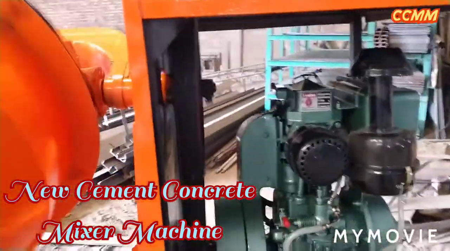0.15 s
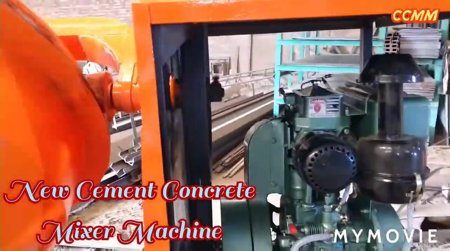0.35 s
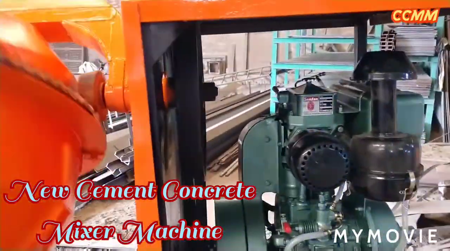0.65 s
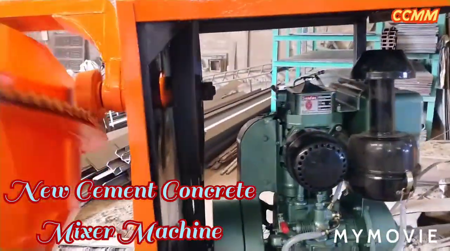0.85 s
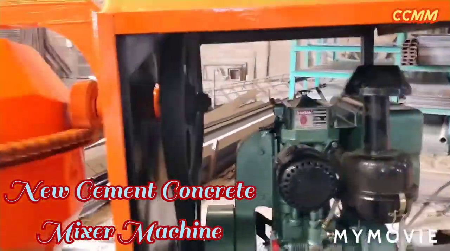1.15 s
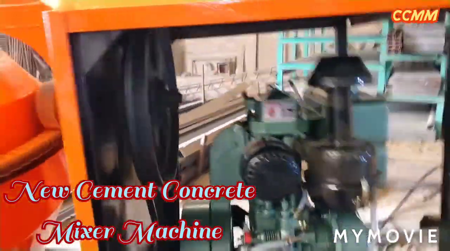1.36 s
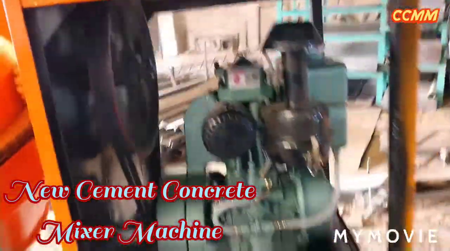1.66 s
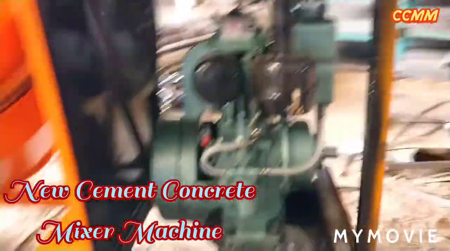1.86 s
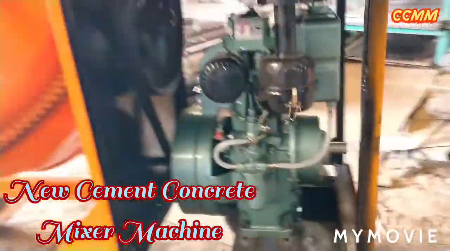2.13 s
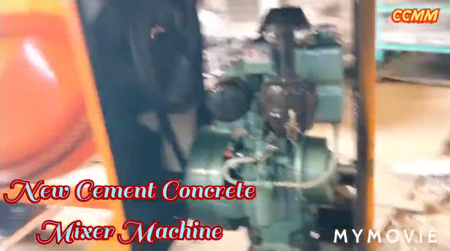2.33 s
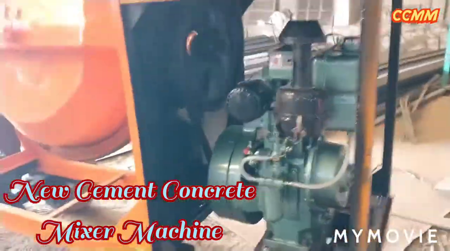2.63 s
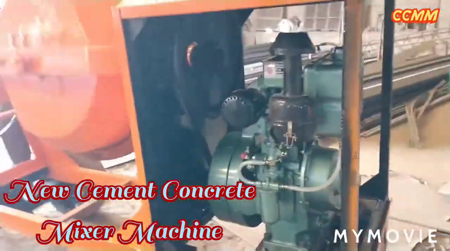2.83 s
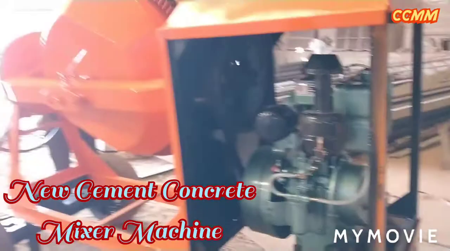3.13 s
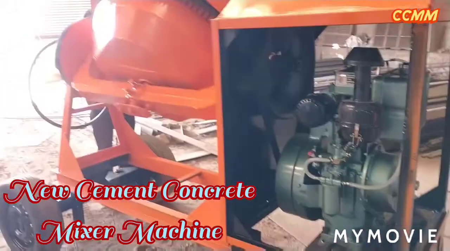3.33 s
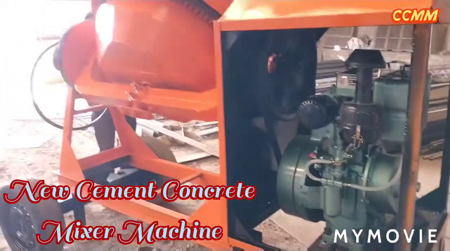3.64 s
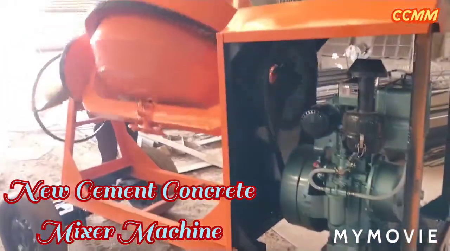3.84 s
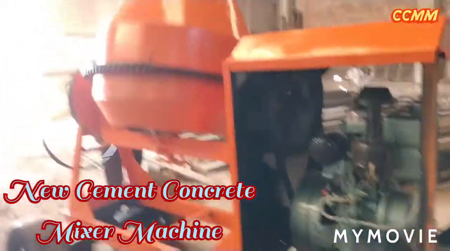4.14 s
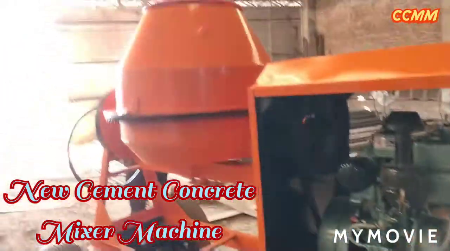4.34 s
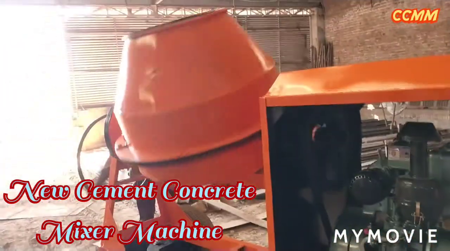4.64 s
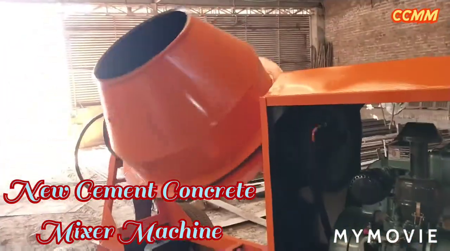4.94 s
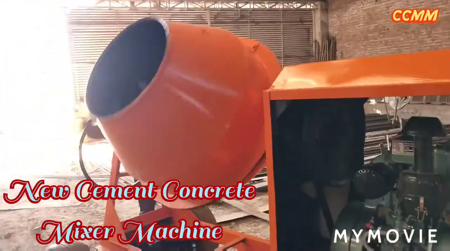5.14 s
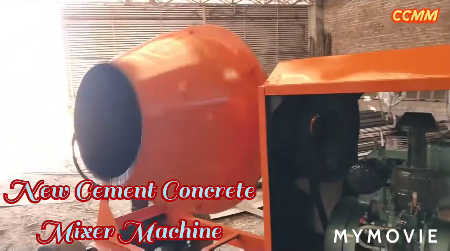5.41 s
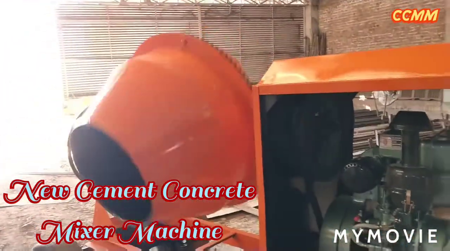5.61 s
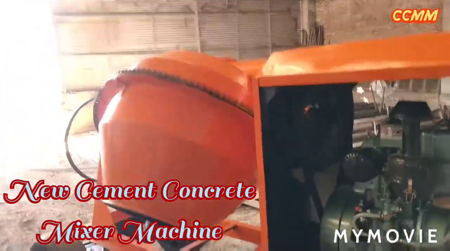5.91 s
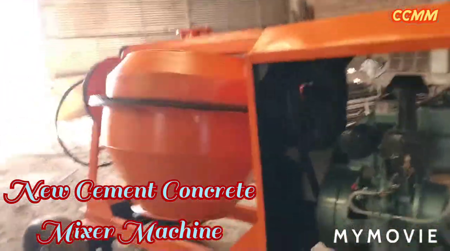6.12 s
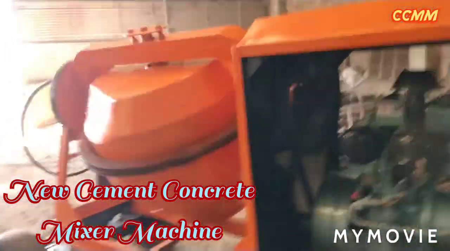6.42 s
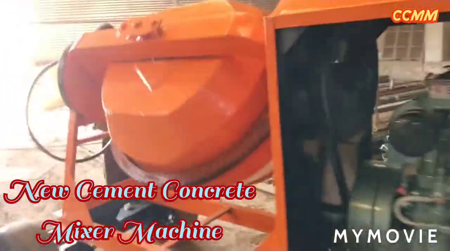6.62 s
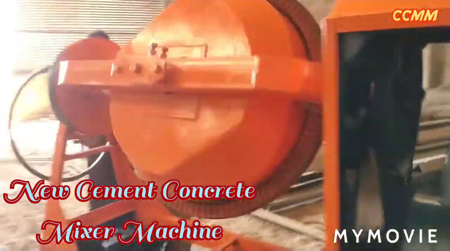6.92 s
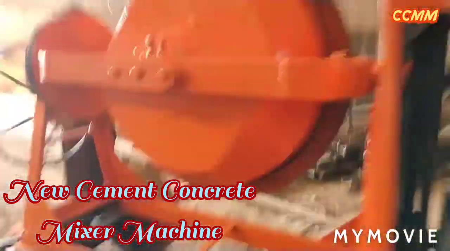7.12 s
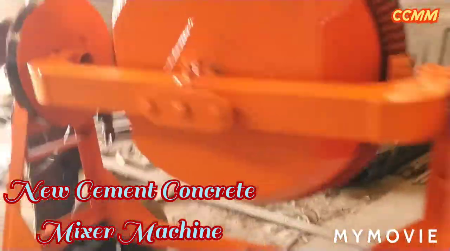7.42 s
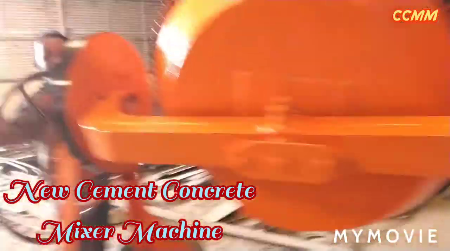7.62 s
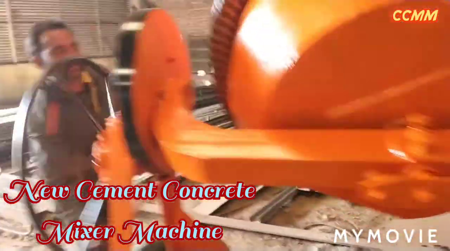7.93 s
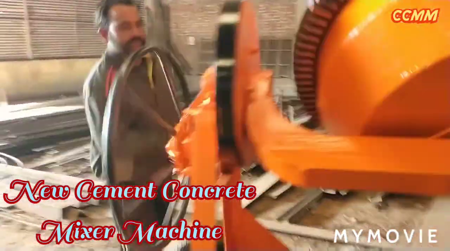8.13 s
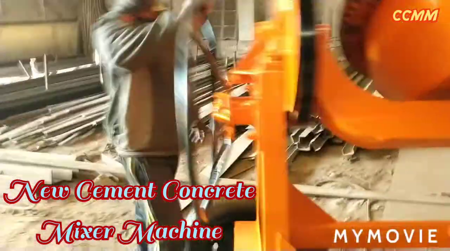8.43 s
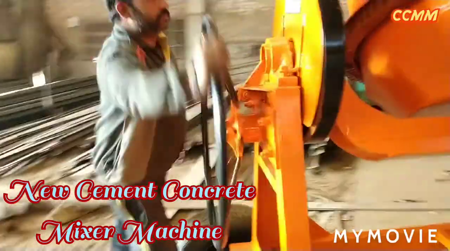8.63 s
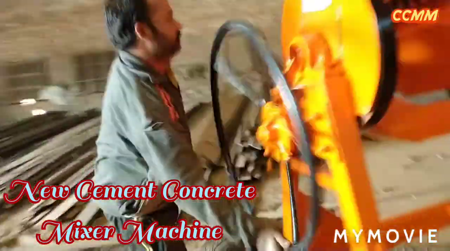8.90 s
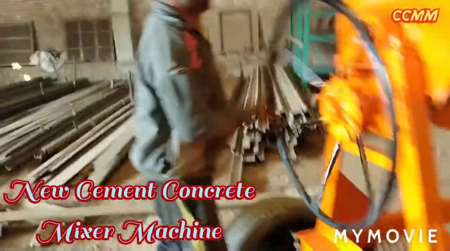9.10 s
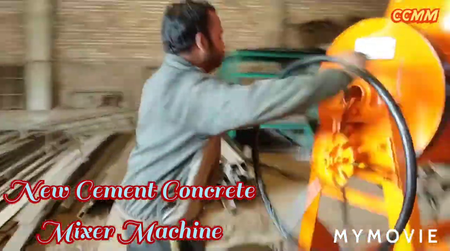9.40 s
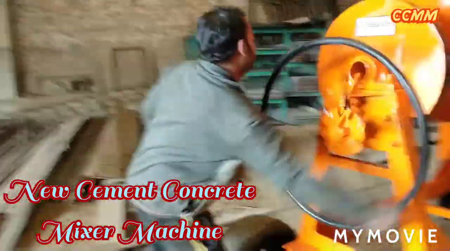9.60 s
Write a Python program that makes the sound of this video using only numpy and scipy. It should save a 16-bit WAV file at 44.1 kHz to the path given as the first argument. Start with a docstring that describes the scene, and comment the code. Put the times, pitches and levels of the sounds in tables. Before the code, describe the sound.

Steady rapid chugging from a small diesel: each beat a spitting exhaust puff, pipe thump, casing clank and small gear knocks and valve ticks. Drum rumble and rushing air fill the gaps. The single moving microphone starts beside it, drifts off from two seconds, passes near again at seven with a lower whistle, and ends with the engine faint.

```python
"""A one-cylinder diesel drives a steel mixer drum in an open yard while a mono microphone walks round it.
Close by at first, coloured noise rumbles and rushes; every tenth of a second a firing sends shaped noise
through resonances: whistling cap, thumping pipe, clanking casing, then gear knocks, valve ticks and chuffs.
The engine recedes from about 2 s, grows nearer again with a lower whistle near 7 s as the microphone
passes behind the drum, and is faint by the end."""
import sys
import numpy as np
from scipy import signal
from scipy.fft import rfft, irfft, next_fast_len
from scipy.io import wavfile
from scipy.ndimage import uniform_filter1d

SR = 44100
rng = np.random.default_rng(int(sys.argv[2]) if len(sys.argv) > 2 else 0)


def master_out(mix):
    """Clip the mix to full scale and print it as 16-bit PCM to the path in sys.argv[1]."""
    frames = np.transpose(np.atleast_2d(mix))
    ceiling = np.clip(frames, -1, 1)
    pcm = np.round(ceiling * 32767).astype(np.int16)
    wavfile.write(sys.argv[1], SR, pcm)


N = 430416  # samples
SPAN = 5120  # samples of one blow
T = np.arange(SPAN) / SR  # seconds
HZ = np.fft.rfftfreq(SPAN, 1 / SR)

# Cylinder firings, levels before each layer's trim: start_s, jet_db, whistle_hz, second_puff_db,
# muffler_shell_db, cylinder_head_db, combustion_shock_db, clank_hz, pipe_thump_db
FIRINGS = [(0.0, -18, 8500, -61, -31.5, -25.5, -30.5, 2070.0, -35),
           (0.1022, -15.5, 8270, -33, -26, -29.5, -33.5, 1660, -29.5),
           (0.2068, -23, 8700, -42, -26.5, -34.5, -35, 1610, -34.5),
           (0.3125, -28, 8600, -54.0, -39.5, -44.5, -39, 1770, -39),
           (0.4158, -30.0, 8240.0, -44, -41.5, -37.5, -42, 1850, -34),
           (0.5226, -21.5, 8820.0, -42.5, -31, -32.5, -29.5, 2140.0, -37),
           (0.6263, -22, 8700, -62, -29.5, -35.5, -41, 1800.0, -35.5),
           (0.733, -18.5, 8340, -44, -39, -36, -34, 1580, -40.5),
           (0.8377, -19, 8150, -41, -37, -36.5, -42, 1820.0, -33),
           (0.9404, -20.5, 8200, -57, -24.5, -33, -28.0, 2000, -37),
           (1.0463, -15.5, 8600, -54, -28.5, -44, -45, 1810.0, -39),
           (1.15, -18.0, 8200, -40, -28.5, -26, -32, 1690, -35),
           (1.2554, -17.5, 8660, -60, -30, -27, -29, 1750, -30),
           (1.3603, -16, 8500, -27.5, -28, -26, -31.5, 1560, -32),
           (1.4656, -18.5, 8540, -47, -33, -26.5, -36, 2100, -34.5),
           (1.5713, -14, 8240, -32, -26, -33.5, -34.5, 2000, -31.5),
           (1.675, -17, 8430, -28, -27.5, -33, -33, 1340.0, -33),
           (1.7797, -17.5, 8200, -35, -22, -36.5, -37, 1730, -35),
           (1.8861, -14, 8330, -28.0, -32.0, -30, -29, 1390, -43),
           (1.9897, -18.5, 8360, -36.5, -22.5, -34, -32.5, 1540.0, -28),
           (2.095, -17.5, 8500, -36.5, -27, -32.5, -25.5, 1570, -40.5),
           (2.1996, -25, 8550, -53.5, -19, -40, -40, 1520.0, -37),
           (2.3046, -25.5, 8800, -52, -34.5, -53, -45, 1930.0, -41.5),
           (2.4105, -24.5, 7700, -43, -35, -55.5, -45, 1810.0, -43),
           (2.517, -19.5, 7800, -43, -52, -57, -38, 1570.0, -38.5),
           (2.6207, -34, 8340, -53, -50, -57, -45.5, 1610.0, -47.0),
           (2.7288, -21.5, 7900, -38, -62, -53, -44, 2120, -43.5),
           (2.8337, -24.5, 8000.0, -48.0, -52, -56.0, -38, 1800, -39),
           (2.9355, -18, 8180, -51, -40, -49, -41, 2060, -43),
           (3.0407, -32, 8500, -46, -51, -57.5, -48, 1820.0, -46),
           (3.1447, -26, 8320.0, -52.0, -42, -67, -43, 1900, -44.0),
           (3.2498, -21, 8100, -48.5, -35, -56, -43.5, 1340.0, -44.5),
           (3.3545, -37.0, 8300, -51.5, -47, -60.5, -50, 1980.0, -47),
           (3.4584, -22.5, 8360, -52.5, -40, -42, -43.5, 1810.0, -42.0),
           (3.564, -27.5, 8500, -59, -42.5, -56, -47, 1340.0, -46.5),
           (3.6699, -24.5, 7970, -39.5, -43, -59, -46, 1840.0, -44),
           (3.7748, -24.5, 8560, -64, -36.5, -60, -47.5, 1820.0, -47.0),
           (3.879, -24, 8690.0, -43, -29.5, -46, -28, 1870, -47),
           (3.9845, -33.5, 8350, -50.0, -43, -56, -41, 1480, -49.5),
           (4.0891, -37.5, 8550, -54.5, -51, -57.5, -44.5, 1800, -49),
           (4.1932, -24.5, 6900, -41, -38, -50, -45.5, 1750.0, -49),
           (4.2988, -40, 7750, -54.0, -50, -45.5, -43, 1830.0, -52),
           (4.4044, -44.5, 8500, -63, -50, -64, -57, 2000.0, -53.0),
           (4.5091, -42, 8900, -62.5, -54, -57, -60, 1800.0, -53.0),
           (4.6157, -27, 8000, -49.5, -42, -42, -34.5, 1860, -44),
           (4.7203, -22, 8140, -52.5, -36, -52, -28.0, 2030, -47),
           (4.8259, -34.5, 8560, -49.5, -51.5, -48, -47, 1830.0, -48),
           (4.9312, -23, 8530, -44, -35, -53.0, -40.0, 1340.0, -46.5),
           (5.0362, -23.5, 8800, -53, -37.5, -45.5, -39.5, 1820.0, -46.5),
           (5.143, -26, 8540, -42.0, -37.5, -55, -47, 1820.0, -45.5),
           (5.248, -38, 8500, -52, -51, -49.5, -49, 1800.0, -50),
           (5.354, -31, 8800, -49, -43.5, -54.5, -45.5, 1530.0, -48.5),
           (5.4587, -38, 8600, -55, -45, -43.5, -39.5, 1340.0, -46),
           (5.5639, -33.5, 8500, -56, -44.5, -56.5, -49, 1820.0, -50.0),
           (5.6707, -37, 8500, -48.0, -45, -63, -59, 1820.0, -50),
           (5.7744, -19, 8840, -54, -41, -42.5, -36, 1750, -40.5),
           (5.8791, -43, 7800, -53.0, -50, -58, -55, 1730.0, -49),
           (5.9859, -22, 8570, -46.0, -34, -48, -47.0, 2280.0, -45),
           (6.0917, -39, 8890.0, -53, -47, -61.5, -47, 1440.0, -49),
           (6.1962, -32.5, 8430, -39, -41, -40, -30.5, 2020, -46),
           (6.303, -27.0, 8650, -45, -37.5, -50, -45.5, 1850.0, -43.5),
           (6.4077, -36.0, 7850, -51, -56, -54, -43.5, 1580.0, -40.5),
           (6.5117, -22.5, 8300, -43, -26, -34, -31, 1450, -46),
           (6.6163, -35.0, 7990.0, -37, -42, -37.5, -44, 1850.0, -41.5),
           (6.7221, -20.0, 7830, -54, -28.0, -44, -34, 1860, -35),
           (6.8262, -19.0, 7360, -31, -23.5, -30.5, -32.5, 1530, -42),
           (6.9323, -16, 7240, -36, -38.5, -42.0, -34.0, 1490, -43.5),
           (7.0374, -15, 7040, -25.5, -30, -38, -34, 1840, -32),
           (7.1436, -10.5, 7740, -29, -26, -31, -41, 1770.0, -38.5),
           (7.249, -11, 7150, -30.5, -34, -32, -35.5, 2080, -39),
           (7.3534, -14.5, 7250, -27, -33, -35, -44, 1650.0, -37),
           (7.4615, -14, 7670, -31, -40, -30.5, -29, 1540, -31.5),
           (7.5655, -14.5, 7780, -43.5, -33, -35, -42, 1620, -41),
           (7.6713, -19, 7200, -40, -39.5, -55, -45, 1490.0, -44),
           (7.7764, -15, 7130, -40, -43, -52, -40, 1840, -43),
           (7.883, -22.5, 7640, -44.0, -54, -64.0, -45.5, 1670, -42),
           (7.9864, -20, 6800, -56, -41.5, -58, -45, 1420.0, -47),
           (8.0948, -32.0, 7800, -53.0, -37, -61.0, -46, 1830.0, -50),
           (8.1994, -27, 8300, -43, -30.5, -52, -49.0, 2220.0, -47),
           (8.3059, -26.5, 7300.0, -64, -43.5, -59.0, -49, 1600.0, -52),
           (8.4122, -26, 7670.0, -52, -37.5, -59, -63, 1600.0, -47.5),
           (8.5169, -24, 7740, -56, -34, -57, -42.5, 1900, -44),
           (8.623, -44, 8460.0, -62, -47.5, -75, -53, 1840.0, -62),
           (8.729, -46.5, 8070.0, -51.5, -55, -70.0, -73, 1630, -59),
           (8.8348, -27, 7750, -37.5, -34.5, -69, -49, 1340.0, -51),
           (8.9405, -29.5, 8040, -45, -48, -74, -47.5, 2080, -49),
           (9.0461, -47.0, 7560, -56.0, -58, -79, -55, 1970, -57),
           (9.1513, -46.5, 7000, -56, -61, -66.5, -58, 2030.0, -53),
           (9.2567, -50, 7300, -61.0, -57, -76.5, -64.0, 1410.0, -62),
           (9.3597, -56, 7660.0, -61, -80.5, -77.0, -64, 1560.0, -59),
           (9.4718, -35, 7600, -56.5, -75, -74.5, -63, 1580, -49.5),
           (9.5762, -39, 7660, -45, -66, -64, -51, 1660.0, -48),
           (9.6798, -45.0, 6900, -48, -57, -70.5, -58.5, 1670.0, -48)]

# Walk round the machine: time_s, nearness_db, air_rush_db, chuff_db
WALK = [(0, 0, -45.5, -35), (.6, -1, -45.5, -36.5), (1.2, 0, -51.5, -35), (1.7, 1, -51, -35),
        (2.1, -1, -41, -37), (2.5, -7, -46, -42), (2.9, -4, -41.5, -39.5), (3.3, -10, -49.5, -47),
        (4.2, -9, -50.5, -45.5), (4.6, -10, -54.5, -46), (5.3, -8, -52.5, -46), (6.2, -8, -52, -49),
        (6.7, -5, -48, -41), (7.1, -3.5, -45.5, -44), (7.5, -6.5, -43.5, -45), (7.9, -13, -48.5, -52),
        (8.5, -14, -54, -50), (8.9, -16, -54.5, -46.5), (9.35, -26, -58, -52.5), (9.76, -16, -54.5, -47)]

# Modes of the perforated muffler cap: pitch_hz, width_hz, level_db
CAP_MODES = [(6420, 1100, -4), (6540, 89, 9.5), (7090, 160, -3.5), (7516, 81, 6), (8010, 460, 0),
             (8814, 230, 2.5), (9080, 620, -7)]
# Modes of the muffler shell: pitch_hz, width_hz, level_db
SHELL_MODES = [(4600, 450, -8.5), (5054, 190, 0), (5534, 245, -1), (5980, 93, -2)]
# Modes of the muffler box: pitch_hz, width_hz, level_db
BOX_MODES = [(247, 110, -1.5), (344.6, 55, 1.5), (406, 140, -9.5)]
# Modes of the muffler, heard in the chuffs: pitch_hz, width_hz, level_db
MUFFLER_MODES = [(512, 16, -8.5), (653, 30, -1.5), (808, 40, -1), (925, 110, -3)]
# Modes of the exhaust pipe: pitch_hz, width_hz, level_db
PIPE_MODES = [(84, 160, -7), (140, 105, 1), (304, 54, -14)]
# Modes of the cylinder head: pitch_hz, width_hz, level_db
HEAD_MODES = [(3200, 1200, 2), (3446, 400, 6), (4056, 240, -2.5)]
# Modes of the frame panels: pitch_hz, width_hz, level_db
FRAME_MODES = [(1328, 174, 0.5), (1560, 117, 0), (1812, 85, 3.5), (2110, 230, -2), (2240, 210, -3.5),
               (2500, 180, -5)]
# Modes of the gear cover: pitch_hz, width_hz, level_db
COVER_MODES = [(438, 23, -3), (641, 58, 5.5), (749, 18, 1.5), (952, 79, -7.5), (1035, 21, 3),
               (1154, 106, 1.5)]
# Modes of the steel drum: pitch_hz, half_width_hz, level_db
DRUM_MODES = [(237, 5, -2), (301, 6, 0), (458, 5, -2), (738, 4, 1), (960, 8, -2), (1017, 7, 0),
              (1147, 6, -1), (1611, 6, -2)]

# Relative spectrum of hissing gas: pitch_hz, density_db (per Hz)
GAS_SPECTRUM = [(3000, -26), (5500, -12.5), (8000, 7), (10200, 5.5), (12000, -8.5), (15300, -9),
                (16200, -52)]
# Relative spectrum of the ring gear's rumble, before the drum modes: pitch_hz, density_db (per Hz)
RUMBLE_SPECTRUM = [(40, -33), (75, -10), (140, 5), (230, -11.5), (310, -3), (540, -8.5), (950, -4.5),
                   (1300, -8.5), (1900, -4.5), (2600, -14), (3100, -26.5), (4300, -21.5), (6000, -31)]
# Relative spectrum of rushing air before the walk behind the drum: pitch_hz, density_db (per Hz)
RUSH_SPECTRUM = [(2500, -4), (3900, -16.5), (5200, -11.5), (6300, -6), (7000, -6.5), (8000, -4.5),
                 (9500, -14.5), (11300, -31), (15300, -28), (16300, -50)]
# Relative spectrum of rushing air from behind the drum onward: pitch_hz, density_db (per Hz)
RUSH_BEHIND_SPECTRUM = [(1470, -14), (2500, 2), (3050, -13.5), (3850, -7), (5310, -30), (5560, -18.5),
                        (7560, 3), (8690, -10), (9310, -20), (9900, -15), (15700, -30)]

# Pressure waves down the pipe: after_firing_ms, level_db
PUSHES = [(1.5, 9), (9.5, 9.5), (18, 4), (30, 7.5), (38, -32), (58, -20), (88, -13)]
# Gear teeth taking up slack: after_firing_ms, level_db
KNOCKS = [(19, -7), (30, -24.5), (81, -29), (88, -4), (94, -11.5)]
# Valves seating and lifting: after_firing_ms, level_db
VALVES = [(30, -6.5), (58, -9), (81, -7.5), (93, -28)]
# Gas surging into the muffler: after_firing_ms, level_db
CHUFFS = [(30, -11.5), (81, -9), (89, -4), (96, -2.5), (102, -9.5)]

# Levels that follow the nearness: (dB at nearness 0, dB gained per dB of nearness)
RUMBLE_LEVEL, TICK_LEVEL, KNOCK_LEVEL, BOX_LEVEL = (-41, 0.31), (-37, 0.98), (-41, 0.61), (-38, 1)
NEAR_DB = 4.5  # range of nearness that counts as close by
BEHIND_S = (7.05, 8.1)  # the microphone passes behind the drum

HISS_DB, HISS_SHARE = -1.5, 0.47  # offset from a level between jet and shell; the shell's share of it
LATE_HZ, LATE_SPREAD_HZ = 7520, 280  # mean pitch of the whistle's tail and its random spread
LATE_FOLLOWS = 0.21  # Hz per Hz of the first whistle
BOX_FOLLOWS, BOX_FEELS_SHOCK = 0.48, 0.31  # dB per dB of the pipe thump, of the shock
COVER_DB = -42  # at an average shock and jet
COVER_FOLLOWS, COVER_FEELS_JET = 0.61, 0.098  # dB per dB of the shock, of the gas jet
COVER_HZ, COVER_SINKS_HZ = 1030, 500  # favoured pitch, how far it may sink close by
CHUFF_HZ, CHUFF_SINKS_HZ = 950, 300  # favoured pitch from afar, how far it sinks close by
FADE_HZ, FADE_DB, TOP_HZ = 15750, -16, 16600  # where the treble drops, gain above it, end of the band


def amp(db):
    """Decibel law: twenty decibels are a factor of ten in amplitude."""
    return 10 ** (np.asarray(db) / 20)


def unit(x):
    """Normalisation by effective value: x at rms 1."""
    return x / np.sqrt(np.mean(x ** 2) + 1e-20)


def along(points, hz):
    """Interpolation of (Hz, value) points on a logarithmic frequency axis."""
    point_hz, value = np.transpose(points)
    return np.interp(np.log(hz + 1), np.log(point_hz + 1), value)


def walk(s, column):
    """Linear interpolation of one column of the walk at times s."""
    rows = np.transpose(WALK)
    return np.interp(s, rows[0], rows[column])


def level(s, rule):
    """Linear distance rule: a level in dB that follows the nearness."""
    return rule[0] + rule[1] * walk(s, column=1)


def close(s):
    """Proximity measure: 1 beside the engine, falling to 0 away from it."""
    return np.clip(1 + walk(s, column=1) / NEAR_DB, 0, 1)


def crank():
    """Flywheel inertia evens out the firings: smooth times of the same crank angle."""
    s = np.transpose(FIRINGS)[0]
    turn = np.arange(len(s))
    return np.polyval(np.polyfit(turn, s, deg=5), turn)


def resonance(hz, width_hz):
    """Damped oscillator: the causal response of one mode, with gain 1 at its peak."""
    return 1j * HZ * width_hz / (hz * hz - HZ * HZ + 1j * HZ * width_hz)


def favour(hz, width_hz, rest):
    """Selective excitation: modes near hz are driven hardest, the others by rest."""
    return rest + abs(resonance(hz[:, None], width_hz)) ** 2


def body(modes, scatter_db, count):
    """Modal superposition: one response per blow, each mode struck at a new strength."""
    chance = rng.standard_normal((count, len(modes)))
    response = 0
    for k, (hz, width_hz, db) in enumerate(modes):
        strength = amp(db + scatter_db * chance[:, k, None])
        response = response + (-1) ** k * strength * resonance(hz, width_hz)  # alternating sign
    return response


def puffs(count, rise, t60, lumpy_db, alike=0):
    """Turbulent bursts: noise rises in about rise s, decays 60 dB in t60 s, with a share alike in all rows."""
    noise = rng.standard_normal((count + 1, 2, SPAN))
    lumps = amp(lumpy_db * unit(uniform_filter1d(noise[1:, 1], 90)))  # lumps of about 2 ms
    share = np.clip(alike, 0, 1)
    blow = np.sqrt(share) * noise[0, 0] + np.sqrt(1 - share) * noise[1:, 0]
    onset = 1 - np.exp(-(T / rise) ** 2)
    return blow * lumps * onset * amp(-60 * T / t60)


def play(drive, response, s, db):
    """Linear filtering: each row through its response, at rms db over its first 20 ms, placed at time s."""
    rows = irfft(rfft(drive) * response, SPAN)
    early_rms = np.sqrt(np.mean(rows[:, :SR // 50] ** 2, axis=1))
    rows = rows * (amp(db) / early_rms)[:, None]
    first = np.round(np.maximum(s, 0) * SR).astype(int)
    where = first[:, None] + np.arange(SPAN)
    return np.bincount(where.ravel(), rows.ravel(), N + SR)[:N]


def noise(spectrum, patchy_db):
    """Spectral shaping: coloured noise of rms 1 with time-frequency patches of random gain."""
    hz, _, z = signal.stft(rng.standard_normal(N), SR, nperseg=1024, noverlap=768)
    field = uniform_filter1d(rng.standard_normal(z.shape), 7, 0)  # across frequency
    field = uniform_filter1d(field, 5, 1)  # across time
    z = z * amp(along(spectrum, hz)[:, None] + patchy_db * unit(field))
    return unit(signal.istft(z, SR, nperseg=1024, noverlap=768)[1][:N])


def drum():
    """Steady excitation: ring-gear noise hums in the drum's modes; cooling air and leaks rush above it."""
    s = np.arange(N) / SR
    f = np.fft.rfftfreq(N, 1 / SR)
    hum = sum(amp(db) / (1 + ((f - hz) / half_width) ** 2) for hz, half_width, db in DRUM_MODES)
    rumble = irfft(rfft(noise(RUMBLE_SPECTRUM, patchy_db=1.5)) * (1 + 3.2 * hum), N)
    behind = np.interp(s, BEHIND_S, (0, 1))
    rush = np.sqrt(1 - behind) * noise(RUSH_SPECTRUM, patchy_db=1.0)
    rush = rush + np.sqrt(behind) * noise(RUSH_BEHIND_SPECTRUM, patchy_db=2.0)
    return amp(level(s, RUMBLE_LEVEL)) * unit(rumble) + amp(walk(s, column=2)) * rush


def exhaust():
    """Jet-driven resonance: gas leaks, whistles in the cap holes, rings the shell and puffs again after 22 ms."""
    s, whistle_db, whistle_hz, again_db, shell_db = np.transpose(FIRINGS)[:5]
    n = len(s)
    chance = rng.standard_normal((n, 2))
    tail_hz = LATE_HZ + LATE_FOLLOWS * (whistle_hz - whistle_hz.mean()) + LATE_SPREAD_HZ * chance[:, 0]
    between_db = HISS_SHARE * shell_db + (1 - HISS_SHARE) * whistle_db
    hiss_db = HISS_DB + between_db + 0.5 * chance[:, 1]

    cap = body(CAP_MODES, 5.1, count=n)
    first = cap * favour(whistle_hz, 430, rest=0.056)
    late = cap * favour(tail_hz, 710, rest=0.079)
    plate = body(SHELL_MODES, 5.5, count=n) * resonance(5220, 2000) ** 2

    leak = play(puffs(n, 0.0097, 0.035, 7.7), first, s - .01, whistle_db - 24.0)
    whistle = play(puffs(n, 0.0063, 0.019, 2.2), first, s, whistle_db - 1.2)
    hiss = play(puffs(n, 0.0041, 0.031, 0.54), amp(along(GAS_SPECTRUM, HZ)), s, hiss_db)
    shell = play(puffs(n, 0.003, 0.054, 2.1), plate, s, shell_db - .6)
    tail = play(puffs(n, 0.0071, 0.043, 3.1), late, s + 0.0016, whistle_db - 8.5)
    again = play(puffs(n, 0.0066, 0.047, 11.0), late, s + 0.022, again_db - 1.5)
    return leak + whistle + hiss + shell + tail + again


def thump():
    """Pulse propagation: a train of pressure waves leaves the pipe after each firing; the muffler box booms."""
    s, (shock_db, pipe_db) = crank(), np.transpose(FIRINGS)[[6, 8]]
    n = len(s)
    box_db = level(s, BOX_LEVEL) + BOX_FOLLOWS * (pipe_db - pipe_db.mean())
    box_db = box_db + BOX_FEELS_SHOCK * (shock_db - shock_db.mean()) + 1.24 * rng.standard_normal(n)
    boom = puffs(n, 0.0024, 0.074, 1.8, alike=0.48)
    box = play(boom, body(BOX_MODES, 5, count=n), s - .004, box_db)

    chance_db = 1.5 * rng.standard_normal((n, len(PUSHES), 1))
    train = 0
    for k, (ms, push_db) in enumerate(PUSHES):
        pulse = np.exp(-((T - ms / 1000) / 0.0011) ** 2)
        train = train + amp(push_db + chance_db[:, k]) * pulse
    pipe = play(train, body(PIPE_MODES, 0.61, count=n) * resonance(70, 260), s, pipe_db + 2.0)
    return box + pipe


def casing():
    """Impact excitation: combustion shock shakes cylinder head, frame panels and gear cover."""
    s, jet_db, head_db, shock_db, frame_hz = np.transpose(FIRINGS)[[0, 1, 5, 6, 7]]
    n = len(s)
    cover_hz = COVER_HZ - COVER_SINKS_HZ * close(s) * rng.random(n)
    cover_db = COVER_DB + COVER_FOLLOWS * (shock_db - shock_db.mean())
    cover_db = cover_db + COVER_FEELS_JET * (jet_db - jet_db.mean()) + 2.5 * rng.standard_normal(n)

    ring = body(HEAD_MODES, 4.9, count=n) * resonance(3480, 940) ** 2
    clank = body(FRAME_MODES, 4.3, count=n) * favour(frame_hz, 480, rest=.27)
    knock = body(COVER_MODES, 3.8, count=n) * favour(cover_hz, 200, rest=.12)
    head = play(puffs(n, 0.0018, 0.06, 1.6), ring, s, head_db - .6)
    frame = play(puffs(n, 0.0011, 0.076, 1.26), clank, s, shock_db + 0.17)
    cover = play(puffs(n, 0.00056, 0.035, 5.3), knock, s, cover_db)
    return head + frame + cover


def repeated_blows(blows, modes, colour, base_db):
    """Periodic excitation: blows return at fixed delays from the crank times, uneven in strength."""
    s = crank()
    n, total = len(s), 0
    for ms, db in blows:
        drive = puffs(n, .001, .014, 1.5, alike=.6)
        blow_db = base_db + db + 3.3 * rng.standard_normal(n)
        total = total + play(drive, body(modes, 4.4, count=n) * colour, s + ms / 1000, blow_db)
    return total


def gear_knocks():
    """Backlash impact: gear teeth take up slack and strike the cover's modes."""
    return repeated_blows(KNOCKS, COVER_MODES, 1, level(crank(), KNOCK_LEVEL))


def valve_ticks():
    """Seating impact: valves excite cap and shell modes with a little broadband hiss."""
    s, ring_hz = crank(), np.transpose(FIRINGS)[2]
    n, total = len(s), 0
    for ms, db in VALVES:
        seat = body(CAP_MODES, 4.5, count=n) * favour(ring_hz, 500, rest=0.57)
        seat = seat + amp(-4.0) * body(SHELL_MODES, 2.4, count=n)
        seat = seat + amp(along(GAS_SPECTRUM, HZ) - 22)
        tick_db = level(s, TICK_LEVEL) + db + 2.5 * rng.standard_normal(n)
        total = total + play(puffs(n, .002, .07, 3), seat, s + ms / 1000, tick_db)
    return total


def chuffs():
    """Cavity resonance: gas surging into the muffler excites its modes, favouring lower ones close by."""
    s = crank()
    colour = favour(CHUFF_HZ - CHUFF_SINKS_HZ * close(s), 260, rest=.15)
    return repeated_blows(CHUFFS, MUFFLER_MODES, colour, walk(s, column=3))


def scene():
    """Superposition of sources: engine and drum at one microphone, the same in both channels."""
    engine = exhaust() + thump() + casing() + gear_knocks() + valve_ticks() + chuffs()
    mono = drum() + engine
    return np.array([mono, mono])


def record(dry):
    """Soft limiting and band limits: peaks round off, deep bass thins, treble drops at FADE_HZ, ends at TOP_HZ."""
    soft = dry / (1 + abs(dry / 0.47) ** 5) ** (1 / 5)
    m = next_fast_len(N)
    f = np.fft.rfftfreq(m, 1 / SR)
    bass = (1j * f / (1j * f + 60)) ** 2  # two high-pass stages at 60 Hz
    treble = amp(FADE_DB * (f > FADE_HZ)) * (f < TOP_HZ)
    return irfft(rfft(soft, m) * bass * treble, m)[:, :N]


dry = scene()
out = record(dry)
master_out(out)
```